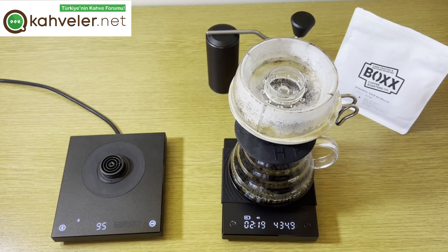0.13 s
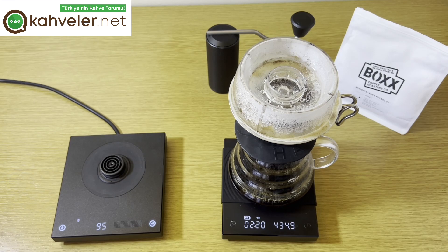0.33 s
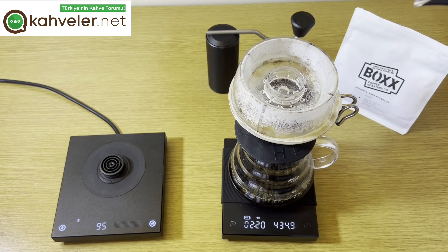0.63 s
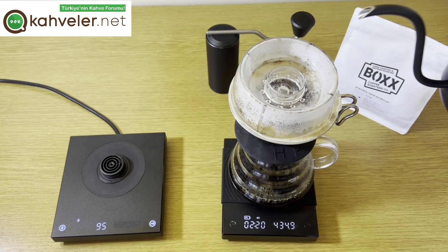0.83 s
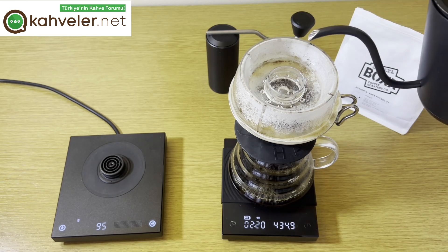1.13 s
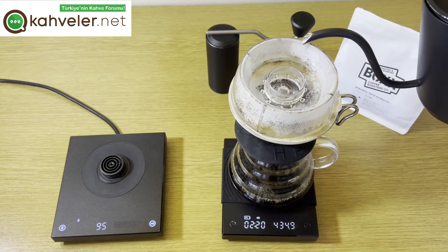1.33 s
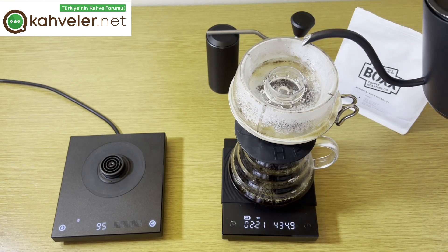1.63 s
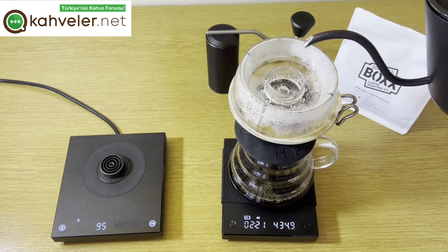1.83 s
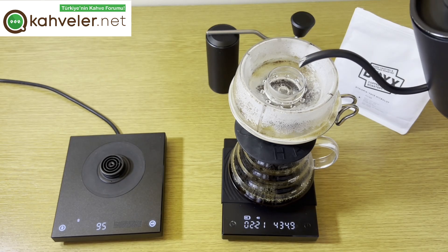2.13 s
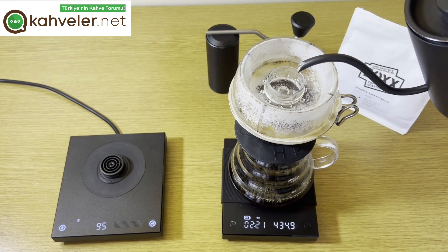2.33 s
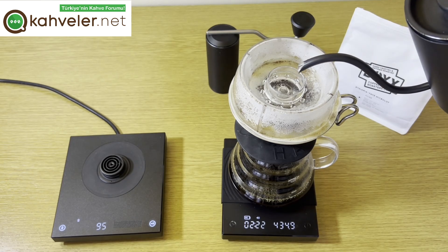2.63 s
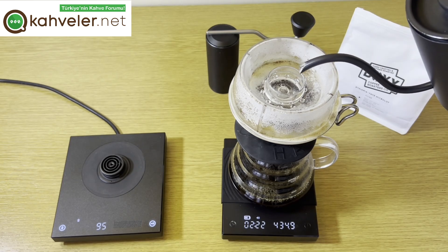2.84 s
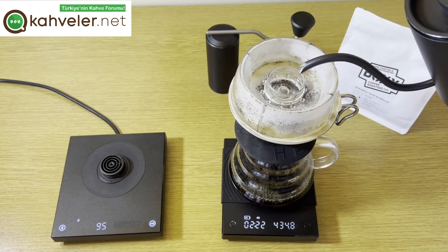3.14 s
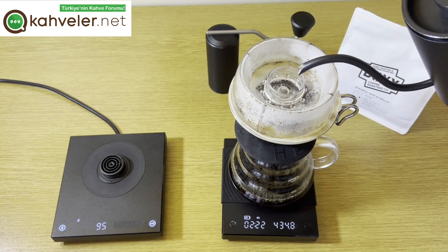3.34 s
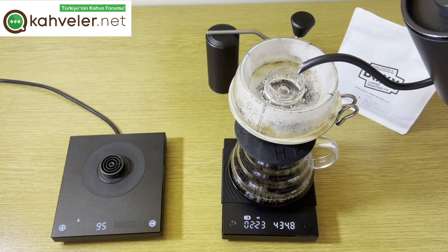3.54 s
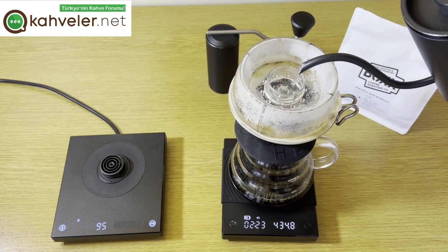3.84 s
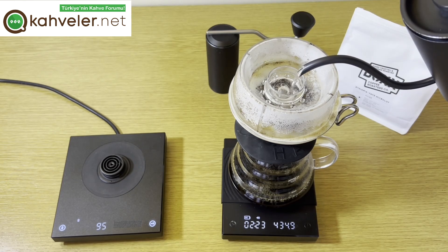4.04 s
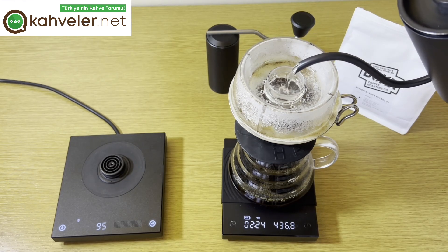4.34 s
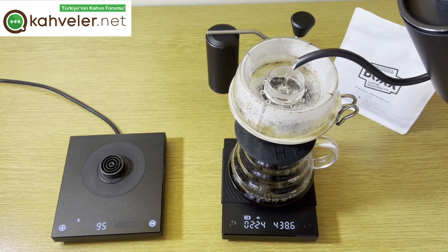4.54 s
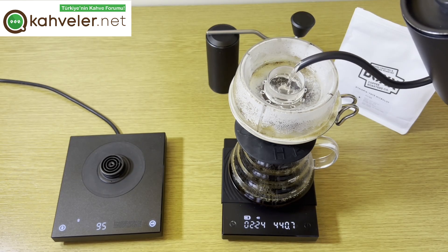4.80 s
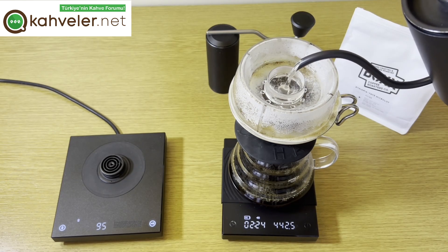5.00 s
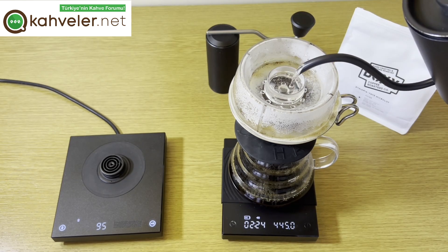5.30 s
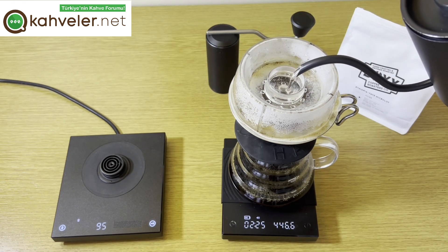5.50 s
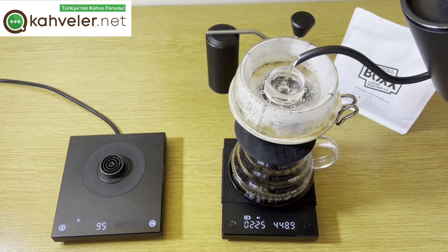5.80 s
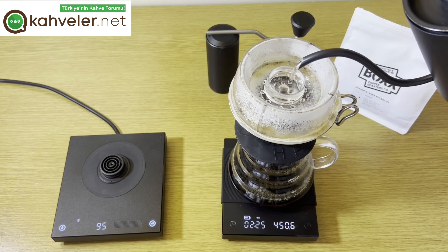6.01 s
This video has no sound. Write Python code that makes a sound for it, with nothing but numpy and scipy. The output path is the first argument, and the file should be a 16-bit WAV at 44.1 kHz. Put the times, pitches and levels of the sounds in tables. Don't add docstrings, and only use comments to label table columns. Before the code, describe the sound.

Coffee drops plip and plop in an uneven patter into a half-full glass server, with tiny glassy ticks over a low ventilation hum.

```python
import sys
import numpy as np
from scipy import signal
from scipy.fft import rfft, irfft
from scipy.io import wavfile
from scipy.ndimage import uniform_filter1d

SR = 44100
rng = np.random.default_rng(int(sys.argv[2]) if len(sys.argv) > 2 else 0)


def put_to_file(sound):
    columns = np.atleast_2d(sound).T
    safe = np.clip(columns, -1, 1)
    whole_steps = np.round(safe * 32767)
    wavfile.write(sys.argv[1], SR, whole_steps.astype(np.int16))


def field_ratio(decibels):
    return 10 ** (np.asarray(decibels, dtype=float) / 20)


N = 271656


def rms_one(x):
    return x / np.sqrt(np.mean(x ** 2) + 1e-20)


def in_time(rows):
    s, *columns = np.transpose(rows)
    return [np.interp(np.arange(N) / SR, s, c) for c in columns]


def at_hz(points, hz):
    table_hz, value = np.transpose(points)
    return np.interp(np.log(hz), np.log(table_hz), value)


def spectrum_hz():
    return np.maximum(np.fft.rfftfreq(N, 1 / SR), 1)


def fade_per_sample(t60):
    return field_ratio(-60 / (t60 * SR))


def filtered(x, order, hz, kind):
    return signal.sosfilt(signal.butter(order, hz, kind, fs=SR, output="sos"), x)


def ring(clicks, hz, t60):
    r = fade_per_sample(t60)
    w = 2 * np.pi * hz / SR
    return signal.lfilter([0, np.sin(w)], [1, -2 * r * np.cos(w), r * r], clicks + 1e-18)


def strike(modes, seconds, level_db, near_hz, focus_db, scatter_db, churn_s, churn_db):
    at, out = np.round(seconds * SR).astype(int), np.zeros(N)
    chance = rng.standard_normal((len(at), len(modes)))
    fade = fade_per_sample(churn_s)
    droplets = rms_one(rng.standard_normal(N) * (.15 + (rng.random(N) < 500 / SR)))
    for k, (hz, mode_db, t60) in enumerate(modes):
        clicks = np.zeros(N)
        near = focus_db * np.exp(-(np.log(hz / near_hz) / 0.045) ** 2)
        clicks[at] = field_ratio(level_db(hz) + mode_db + near + scatter_db * chance[:, k])
        churn = signal.lfilter([np.sqrt(1 - fade ** 2)], [1, -fade], clicks + 1e-18) * droplets
        out += ring((-1) ** k * clicks + field_ratio(churn_db) * churn, hz, t60)
    return out


def bursts(seconds, peak_db, pitch_hz, cycles, rise):
    size = 2000
    out, t = np.zeros(N + size), np.arange(size) / SR
    for s, db, hz in zip(seconds, peak_db, pitch_hz):
        turns = t * hz / cycles
        swell = turns * np.exp(1 - turns)
        out[round(s * SR):][:size] += field_ratio(db) * swell * np.sin(2 * np.pi * hz * t * (1 + rise * turns))
    return out[:N]


def drops(table, modes, ring_db, bubble_db, cycles):
    s, peak_db, hz = np.transpose(table)
    air = strike(modes, s, lambda f: peak_db + ring_db, hz,
                 focus_db=9.5, scatter_db=3.5, churn_s=.05, churn_db=-3.5)
    air = filtered(air, 2, [modes[0][0] * 1.02, modes[-1][0] * 1.08], "band")
    return air + bursts(s, peak_db + bubble_db, hz, cycles, rise=0.0012)


def puff(size, t60, per_s):
    grains = rng.standard_normal(size) * (.3 + (rng.random(size) < per_s / SR))
    return rms_one(grains) * field_ratio(-60 * np.arange(size) / (t60 * SR))


# f/Hz, side minus mid level/dB
PORT_WIDTH = [(30, -41.5), (80, -40), (180, -17), (350, -9), (700, 1.5), (1200, 0.5), (2500, -7),
              (5000, -3), (5800, -10), (7500, -15.5), (8300, -9), (10800, 3.5), (12500, 10.5)]


def widened(mid, side):
    return mid + irfft(rfft(side) * field_ratio(at_hz(PORT_WIDTH, spectrum_hz())), N) * [[1], [-1]]


def coloured(spectrum):
    noise = rfft(rng.standard_normal((2, N)))
    mid, side = irfft(noise * field_ratio(at_hz(spectrum, spectrum_hz())), N)
    return widened(mid, side) / np.std(mid)


# t/s, level/dB
HUM_LEVEL = [
    (0.0, -46.5),
    (3.0, -46.5),
    (6.16, -47),
]
# f/Hz, level/dB
# per Hz
VENTILATION_COLOUR = [(20, -31), (32, -23), (40, -16), (48, -9), (57, -15), (68, -2), (78, -10), (92, -5),
                      (99, -1), (108, -8), (123, -17), (136, -10), (175, -24),
                      (200, -19), (262, -19.5), (300, -29.5), (330, -25.5), (400, -33.5), (464, -27.5), (490, -39),
            (518, -25.5), (560, -39.5), (597, -33), (700, -41), (1000, -69), (1300, -81)]


def hum():
    motor_hz, motor_db, left_lean = 98.86, -54, 0.098
    air = coloured(VENTILATION_COLOUR)
    lean = left_lean * filtered(air.mean(axis=0), 1, [250, 1200], "band")
    motor = field_ratio(motor_db) * np.sqrt(2) * np.sin(2 * np.pi * motor_hz * np.arange(N) / SR)
    return field_ratio(in_time(HUM_LEVEL)[0]) * (air + lean * [[1], [-1]]) + motor


# t/s, patter level/dB, hiss level/dB
TRICKLE = [
    (0.0, -100, -86),
    (0.36, -97, -79.5),
    (0.79, -101, -76.5),
    (1.61, -73, -84.5),
    (1.8, -69, -82.5),
    (2.01, -93, -84),
    (3.12, -74, -84),
    (6.16, -87.5, -83.5),
]
# f/Hz, level/dB per Hz
HISS_COLOUR = [(500, -18), (750, -0.5), (1000, -6), (1800, -9), (2200, -12), (3100, -17.5), (8000, -19.5),
               (10800, -31), (12300, -37), (16000, -49)]


def trickle_hiss():
    return field_ratio(in_time(TRICKLE)[1] + 3.5) * coloured(HISS_COLOUR)


def patter(modes, level_db, per_s):
    sizes = field_ratio(5.0 * np.minimum(rng.exponential(1, N), 2.6)) * rng.choice([-1, 1], N)
    born, dealt = rng.random(N) < per_s / SR, rng.integers(0, len(modes), N)
    rings = np.zeros(N)
    for k, (hz, db, t60) in enumerate(modes):
        rings += field_ratio(db) * ring(sizes * born * (dealt == k), hz, t60)
    return field_ratio(level_db) * rms_one(rings)


# f/Hz, level/dB, time to fall 60 dB/s
AIR_LOW = [(1270, -6, .055), (1445, -1, .045), (1630, -2, .035), (1755, -2, .03), (1845, -1, .035),
           (1920, -5, .025)]
# f/Hz, level/dB, time to fall 60 dB/s
AIR_HIGH = [(2345, -2, .055), (2595, -2, .045), (2725, -10, .075), (2825, -1, .04), (2980, -11, .03),
            (3210, -12, .05)]
# f/Hz, level/dB, time to fall 60 dB/s
GLASS = [(4290, -14, .075), (4640, 1, .04), (4850, -3, .03), (5530, -13, .03), (6210, -6, .03),
         (6410, -3, .035), (7830, -9, .025), (8140, -3, .03), (9120, -10, .015), (9560, -9, .025),
         (10300, -11, .015), (11200, -6, .015), (12400, -16, .01)]


def trickle_patter():
    patter_db, hiss_db = in_time(TRICKLE)
    on_coffee = patter(AIR_LOW + AIR_HIGH, patter_db - 7.0, per_s=170)
    return on_coffee + patter(GLASS, hiss_db - 8.0, per_s=370)


# t/s, peak level/dB, strongest ring f/Hz, top edge level/dB
SPLASHES = [(.3082, -63.5, 4830, -94), (.3642, -59, 6000, -77), (.4991, -56.5, 6070, -66.5),
            (.52, -61, 6300, -72), (1.0419, -57.5, 6140, -72), (1.1061, -52, 6550, -66.5),
            (1.274, -65, 6130, -76), (1.5941, -67, 6410, -77), (1.7644, -65, 4600, -91),
            (1.8582, -66.5, 4530, -92), (1.8877, -60, 6200, -79), (2.1075, -69.5, 6360, -86),
            (2.2345, -61.5, 6170, -85), (2.4334, -78, 4770, -93), (3.0251, -61.5, 6370, -78),
            (3.4667, -58.5, 4550, -70), (4.2976, -66.5, 6400, -82)]
# t/s, peak level/dB, strongest ring f/Hz
TAPS = [(1.5945, -68, 4640), (1.977, -71, 4260), (2.8635, -68, 4600), (2.972, -70, 4640),
        (3.0256, -72, 4600), (3.138, -69, 4900), (3.2085, -70, 4640), (5.345, -69, 4700),
        (0.0815, -73, 4800), (.1176, -73, 4850), (.2089, -66, 6230), (1.221, -63, 6150),
        (1.2516, -65, 4870), (2.394, -58, 5530), (3.284, -61, 4600), (4.415, -69, 6260),
        (4.7935, -72, 4800), (5.545, -71, 4800), (5.63, -70, 4700), (0.991, -65, 4940),
        (1.0258, -63.5, 4780), (1.077, -62, 4270), (1.836, -73, 8100), (2.9727, -65.5, 6220),
        (3.2438, -61, 6020), (3.395, -61, 4570), (3.6288, -63, 4840), (3.938, -66.5, 4620),
        (4.32, -60, 4810), (4.3576, -64.5, 8160), (4.5186, -64, 4730), (4.666, -66, 4730),
        (4.9772, -60.5, 4930), (5.237, -56.5, 4700), (5.652, -59.5, 4670), (5.948, -67.5, 8100)]
# t/s, peak level/dB, strongest ring f/Hz, top edge level/dB
TICKS = [(0.1, -55.5, 5730, -77), (.159, -52.5, 4470, -72.5), (.1605, -60, 6300, -95),
         (.1805, -63, 8050, -68), (.2211, -55.5, 6240, -82), (0.257, -55, 5530, -79),
         (0.4026, -58.5, 7760, -70), (.6081, -63, 4640, -69), (0.63, -48.5, 5100, -65.5),
         (0.6526, -57, 4600, -67), (0.696, -55.5, 8100, -68), (.841, -43.5, 4480, -63),
         (.9231, -63, 8100, -74), (1.3322, -58, 6450, -100), (1.344, -66, 8060, -75),
         (1.615, -59, 4570, -77), (1.6494, -53.5, 6130, -74), (1.7197, -52, 4870, -81),
         (1.96, -57, 5600, -93), (2.3617, -53, 6450, -64), (2.3686, -69, 5530, -97),
         (2.642, -57, 8370, -75), (2.782, -50, 4540, -69.5), (2.8237, -56, 4920, -76),
         (2.8627, -53, 6430, -83), (2.9374, -51, 6600, -95), (2.9377, -62, 4600, -97),
         (3.208, -55.5, 7100, -72.5), (3.5443, -54, 5530, -76), (4.2752, -54.5, 8470, -70),
         (5.3312, -55, 6520, -70), (5.5934, -49, 4940, -64)]


def wall_hits():
    taps = [(s, db, hz, db - 26 + 17 * np.log2(hz / GLASS[0][0])) for s, db, hz in TAPS]
    return SPLASHES + taps + TICKS


def ticks():
    s, peak_db, hz, top_db = np.transpose(wall_hits())
    glass = strike(GLASS, s, lambda f: peak_db - 19.5 if f < 9000 else top_db, hz,
                   focus_db=14.0, scatter_db=2.5, churn_s=.07, churn_db=6.5)
    splash = np.zeros(N)
    for band_hz, db, t60 in [([3230, 6500], peak_db - 9.0, 0.081), ([8100, 13700], top_db + 8.0, 0.043)]:
        clicks = np.zeros(N)
        clicks[np.round(s * SR).astype(int)] = field_ratio(db)
        fade = signal.lfilter([1], [1, -fade_per_sample(t60)], clicks + 1e-18)
        splash += filtered(fade * rng.standard_normal(N), 2, band_hz, "band")
    return glass + splash


# t/s, deep level/dB, deep f/Hz, bright level/dB, bright f/Hz
FULL_DROPS = [(0.298, -51.5, 1510, -49, 2250), (0.3635, -44.5, 1710, -49, 2760),
              (0.4995, -37.5, 1840, -41, 2770), (0.521, -41, 1810, -49.5, 2720),
              (0.6079, -50.5, 1760, -46, 2820), (0.6524, -45.5, 1280, -41, 2318),
              (0.8407, -38.5, 1830, -56, 2570), (1.042, -40.5, 1840, -42.5, 2600),
              (1.1055, -45, 1790, -35, 2754), (1.273, -42, 1708, -45.5, 2826),
              (1.5941, -42.5, 1726, -53, 2300), (1.717, -40, 1750, -52, 2770),
              (1.7635, -37.5, 1484, -48, 2270), (1.859, -53.5, 1197, -50, 2355),
              (1.8877, -51.5, 1210, -49, 2300), (2.1077, -46.5, 1810, -48, 2650),
              (2.2346, -44.5, 1470, -49, 2310), (2.4332, -46.5, 1730, -49, 2800),
              (2.7825, -43.5, 1686, -46.5, 3230), (2.863, -54, 1530, -45.5, 2790),
              (3.0245, -40, 1715, -48, 2650), (3.4657, -49, 1730, -35, 2670),
              (3.5462, -47, 1785, -54, 2650), (4.2968, -44, 1790, -48.5, 2730)]
# t/s, peak level/dB, bubble f/Hz
PLOPS = [(0.1744, -52, 1460), (0.2198, -52, 1260), (0.2367, -47.5, 1250), (0.256, -47.5, 1440),
         (.402, -45.5, 1446), (0.9907, -44, 1510), (1.2502, -47, 1500), (1.9292, -46, 1454),
         (2.1626, -56.5, 1500), (2.3031, -41, 1460), (2.3608, -50.5, 1430), (2.532, -53, 1484),
         (2.9704, -53.5, 1460), (3.2082, -47.5, 1470), (3.2439, -46, 1510), (3.2852, -48.5, 1540),
         (3.615, -44.5, 1487), (3.6555, -53, 1393), (3.7016, -46.5, 1480), (3.84, -55, 1240),
         (4.0827, -48.5, 1430), (4.2458, -42, 1480), (4.471, -47.5, 1300), (4.7229, -45, 1490),
         (4.7928, -55.5, 1514), (4.977, -59, 1460), (5.3299, -52.5, 1524), (5.476, -48.5, 1470),
         (5.9455, -54, 1490), (6.0833, -46.5, 1498)]
# t/s, peak level/dB, bubble f/Hz
PLIPS = [(.1014, -48.5, 1840), (0.7564, -56.5, 1800), (0.9124, -43.5, 1850), (0.9225, -52, 1880),
         (1.1202, -45.5, 1670), (1.1355, -59, 1860), (1.2184, -58.5, 1640), (1.4965, -45, 1726),
         (1.6493, -44.5, 1715), (2.3881, -44.5, 1755), (2.6277, -53, 1740), (2.7597, -54, 1710),
         (2.8235, -40, 1770), (2.8376, -42, 1860), (3.1396, -57, 1810), (3.5027, -58, 1810),
         (3.7172, -50.5, 1850), (3.9478, -53, 1730), (4.09, -50.5, 1800), (4.2742, -37, 1745),
         (4.357, -44.5, 1740), (4.3717, -53, 1660), (4.4073, -51, 1795), (4.5175, -37, 1704),
         (5.076, -57.5, 1766), (5.244, -50, 1770), (5.5463, -51, 1870), (5.595, -44, 1880),
         (5.6505, -50, 1704), (5.7742, -53, 1850)]
# t/s, bubble f/Hz
STRAYS = [(0.085, 1910), (.1176, 1600), (.159, 1590), (0.3122, 1460), (0.41, 1450), (1.0774, 1460),
          (1.1949, 1800), (1.976, 1750), (2.3267, 1430), (2.7026, 1450), (2.732, 1770), (2.934, 1430),
          (3.9016, 1270), (4.1346, 1410), (4.558, 1500), (4.595, 1680), (4.852, 1720), (5.055, 1480),
          (5.236, 1800), (5.2634, 1630), (5.3757, 1890), (5.7025, 1260), (5.9106, 1890), (5.931, 1800),
          (5.9823, 1430)]
STRAY_DB = -59.5
# t/s, peak level/dB, bubble f/Hz
DRIBBLES = [(0.163, -54, 1340), (.1895, -57, 1440), (0.191, -58, 1900), (0.228, -56, 1350),
            (0.344, -70, 1450), (.378, -50, 1440), (.445, -63, 2320), (0.578, -63, 1800),
            (0.735, -59, 1700), (.757, -60, 2350), (1.3198, -62.5, 2360), (1.4433, -60, 2280),
            (1.516, -59, 1660), (1.611, -58, 2300), (1.665, -59, 2800), (1.779, -62, 2780),
            (1.8353, -52, 1740), (1.8365, -66, 2330), (1.9574, -59, 2800), (1.9754, -59, 2370),
            (2.005, -68, 2300), (2.1009, -59.5, 1830), (2.2224, -60, 1730), (2.304, -60, 2800),
            (2.33, -66, 2750), (2.362, -62, 2820), (2.461, -57.5, 2810), (2.58, -66, 1420),
            (2.6444, -62, 1610), (2.9716, -57, 2630), (3.0054, -56, 1450), (3.1707, -62, 1630),
            (3.72, -61.5, 2330), (3.827, -68, 1470), (3.8666, -72, 2345), (3.9978, -68, 1850),
            (4.0223, -65, 2830), (4.03, -64, 1450), (4.2318, -67, 1590), (4.4567, -58, 1220),
            (4.75, -72, 2820), (4.8988, -77, 1750), (5.1532, -61, 2780), (5.1797, -69, 1640),
            (5.236, -65, 3270), (5.4326, -65, 1480), (6.042, -66, 2825)]
FAMILY_SPLIT_HZ = 2100


def deep_drops():
    main = np.vstack([np.array(FULL_DROPS)[:, :3], PLOPS, PLIPS])
    late, size, mode = rng.random((len(main), 3)).T
    s = main[:, 0] + 0.015 + 0.021 * late
    db = main[:, 1] - 23.5 + 5 * (size - .5)
    hz = np.array(AIR_LOW)[(mode * len(AIR_LOW)).astype(int), 0]
    strays = [(s, STRAY_DB, hz) for s, hz in STRAYS]
    dribbles = [row for row in DRIBBLES if row[2] < FAMILY_SPLIT_HZ]
    table = np.vstack([main, np.c_[s, db, hz], strays, dribbles])
    return drops(table, AIR_LOW, ring_db=-13.5, bubble_db=-2.5, cycles=2.1)


# t/s, peak level/dB, bubble f/Hz
BRIGHT_DROPS = [(0.477, -53, 3140), (0.9119, -56, 3230), (0.9231, -55, 2300), (.991, -56.5, 2765),
                (1.0953, -56, 2700), (1.219, -54, 2330), (1.3643, -54.5, 2310), (1.4598, -48, 2830),
                (1.495, -54.5, 2620), (1.9575, -60, 2280), (2.257, -57, 2640), (2.389, -59, 2330),
                (2.5328, -55.5, 2776), (3.2435, -52, 2310), (3.2852, -55.5, 3220), (3.395, -41.5, 2850),
                (3.6287, -56.5, 2870), (3.655, -52, 2820), (3.941, -58.5, 2820), (3.966, -60, 2345),
                (4.3563, -54.5, 2540), (4.5624, -49, 2320), (5.1408, -62.5, 2640), (5.4759, -57, 2810),
                (5.5924, -57, 2870), (5.6066, -51, 2700), (5.7346, -58.5, 2780), (5.7739, -49.5, 2760)]


def bright_drops():
    nudges = [(s, db - 23.5) for s, db, _ in PLOPS + PLIPS] + [(s, STRAY_DB - 12.5) for s, _ in STRAYS]
    s, db = np.transpose(nudges)
    size, mode = rng.random((len(s), 2)).T
    hz = np.array(AIR_HIGH)[(mode * len(AIR_HIGH)).astype(int), 0]
    upper = np.c_[s, db + 6 * (size - .5), hz]
    dribbles = [row for row in DRIBBLES if row[2] > FAMILY_SPLIT_HZ]
    table = np.vstack([upper, np.array(FULL_DROPS)[:, [0, 3, 4]], BRIGHT_DROPS, dribbles])
    return drops(table, AIR_HIGH, ring_db=-11.5, bubble_db=-2.8, cycles=3.6)


# t/s, peak level/dB, centre f/Hz
MISTS = [(0.1167, -74, 9500), (.2079, -67, 10300), (1.2183, -74, 10500), (1.8362, -69.5, 9200),
         (2.223, -68, 10300), (2.3922, -75, 8800), (2.6214, -66.5, 11200), (3.865, -70, 10900),
         (3.903, -76.5, 9600), (3.9467, -69, 10400), (4.0822, -64.5, 11200), (4.3558, -72, 9450),
         (4.411, -82, 9900), (4.775, -67, 12100), (4.825, -68, 9500), (5.402, -76, 11100),
         (5.6253, -67.5, 9200), (5.9453, -63.5, 9100)]


def spray():
    out, size = np.zeros(N + SR), SR // 10
    swell = np.minimum(np.arange(size) / SR / .0015, 1)
    for s, db, hz in MISTS:
        edges = hz * 2 ** (0.35 * np.array([-1, 1]))
        grains = swell * puff(size, t60=0.052, per_s=3300)
        mist = filtered(grains, 4, np.minimum(edges, 19000), "band")
        out[round(s * SR):][:size] += field_ratio(db + 7) * mist
    return out[:N]


# t/s, peak level/dB
CRACKS = [(0.157, -65), (0.5, -89), (0.608, -72), (0.629, -76), (0.6953, -82), (0.841, -72), (1.042, -81),
          (1.1059, -74), (1.6187, -92), (2.3614, -75), (2.6229, -85), (2.7826, -72), (2.8629, -77),
          (3.2061, -79), (3.467, -80), (3.5453, -80), (3.9409, -76), (4.0826, -85), (4.2727, -85),
          (4.775, -72), (5.3298, -91), (5.5922, -73)]


def cracks():
    out, size = np.zeros(N + SR), SR // 10
    for s, db in CRACKS:
        out[round(s * SR):][:size] += field_ratio(db + 7.5) * puff(size, t60=0.0066, per_s=SR)
    return filtered(out[:N], 3, 11500, "high") * (1 + 1.5 * np.array([[1], [-1]]))


# t/s, f/Hz, rms level/dB
SQUEAKS = [
    [(.31, 8300, -101), (.37, 9100, -87), (.42, 9250, -88), (.5, 9600, -100)],
    [(.66, 10800, -81), (.72, 11500, -77), (.77, 11300, -80)],
    [(.785, 10400, -73), (.82, 9540, -81), (.85, 9500, -84)],
    [(.69, 4310, -80), (.76, 4080, -76), (.83, 3720, -78)],
    [(.9, 11000, -82), (.94, 11900, -82), (1.01, 11000, -90)],
    [(.96, 13700, -81), (1.0, 12400, -83), (1.05, 11000, -94)],
    [(5.62, 12300, -101), (5.67, 12700, -98), (5.72, 12150, -90), (5.76, 12000, -92), (5.8, 12700, -90),
     (5.83, 12000, -94)],
]


def squeaks():
    out, t = np.zeros(N), np.arange(N) / SR
    waver = .85 + .45 * rms_one(uniform_filter1d(rng.standard_normal(N), size=200))
    for rows in SQUEAKS:
        hz, db = in_time(rows)
        gate = np.clip(np.minimum(t - rows[0][0], rows[-1][0] - t) / 0.0072, 0, 1)
        out += gate * field_ratio(db + 4) * waver * np.sin(2 * np.pi * np.cumsum(hz) / SR)
    return out


# t/s, peak level/dB, bubble f/Hz
GULPS = [
    (0.651, -61, 866),
    (1.273, -64, 875),
    (4.4715, -59, 1030),
    (4.247, -67, 797),
    (4.518, -62, 830),
    (5.057, -67, 1045),
    (5.651, -62.5, 1110),
]


def gulps():
    return bursts(*np.transpose(GULPS), cycles=4.8, rise=.006)


# f/Hz, phase by which the left port lags/rad
PORT_PHASE = [(1000, 0.11), (3000, 0.68), (4800, 1.84), (5800, 0.14), (7400, 0.089), (8300, 1.2),
              (10500, 1.35), (12500, 2.47), (16000, 3.4)]


def ports(x):
    turn = at_hz(PORT_PHASE, spectrum_hz()) * [[-.5], [.5]]
    return irfft(rfft(x) * np.exp(1j * turn), N)


def room(x):
    t60, level_db = 0.28, -11.5
    t = np.arange(SR // 2) / SR
    tail = rng.standard_normal((2, len(t))) * field_ratio(-60 * t / t60) * np.clip(t / 0.0072, 0, 1)
    echoes = signal.fftconvolve(x[None], tail / np.linalg.norm(tail[0]), axes=1)[:, :N]
    return field_ratio(level_db) * widened(*echoes)


def scene():
    water = trickle_patter() + ticks() + deep_drops() + bright_drops() + spray()
    near = filtered(water, 4, 1000, "high")
    near += squeaks() + gulps()
    return hum() + trickle_hiss() + ports(near) + room(near) + cracks()


def roll_off(x):
    return signal.sosfilt(signal.butter(12, 15820, fs=SR, output="sos"), x)


def record(dry):
    return roll_off(dry)


dry = scene()
out = record(dry)
put_to_file(out)
```